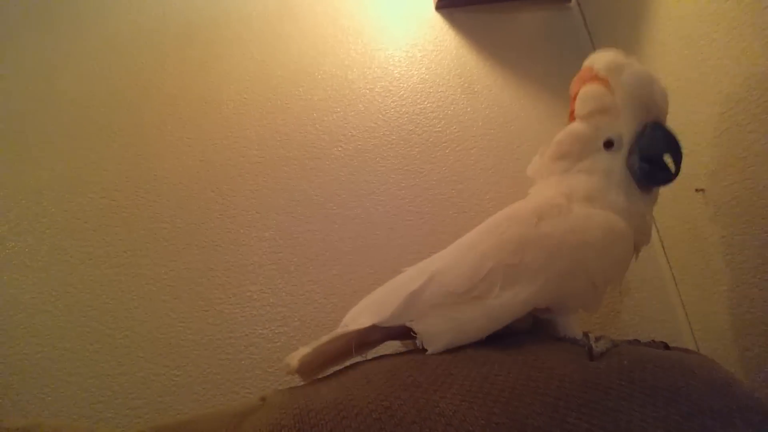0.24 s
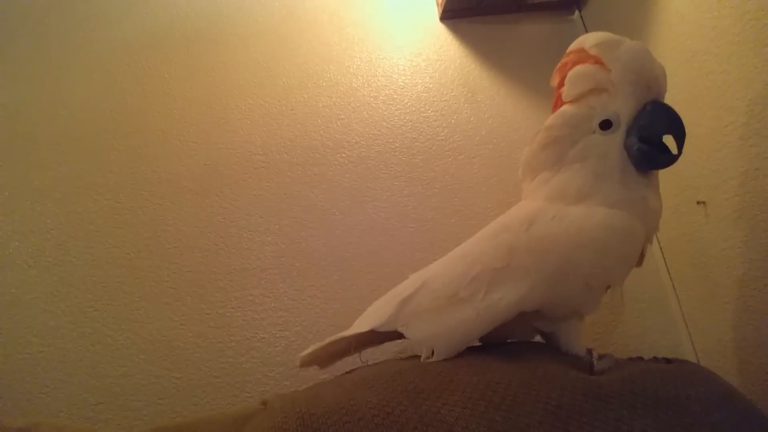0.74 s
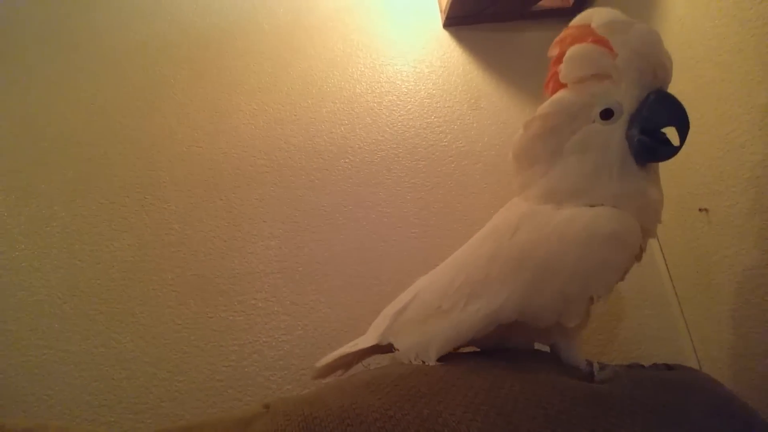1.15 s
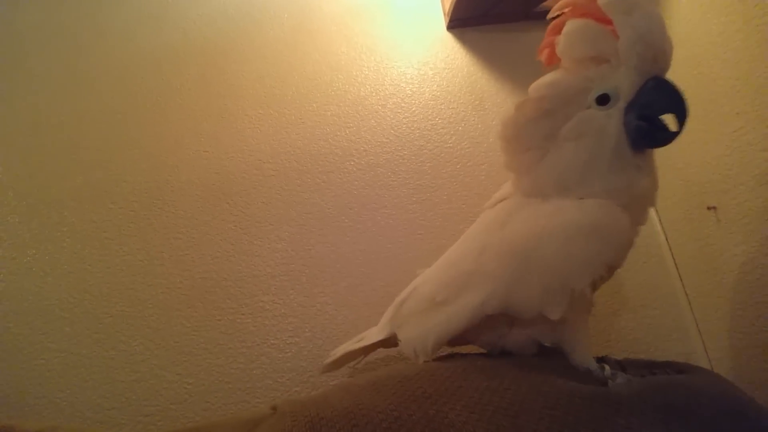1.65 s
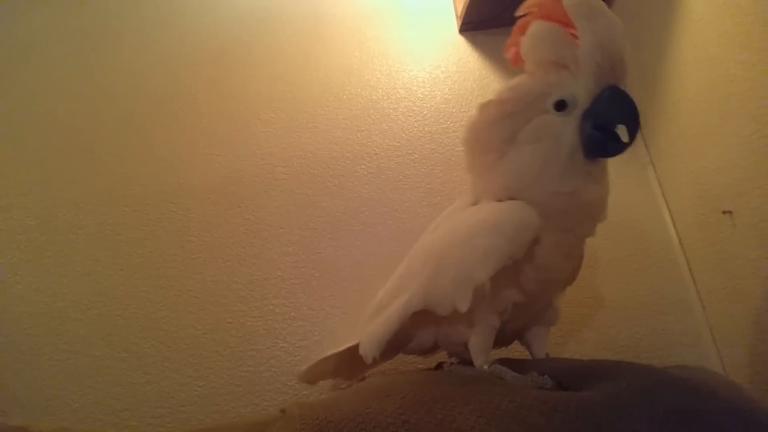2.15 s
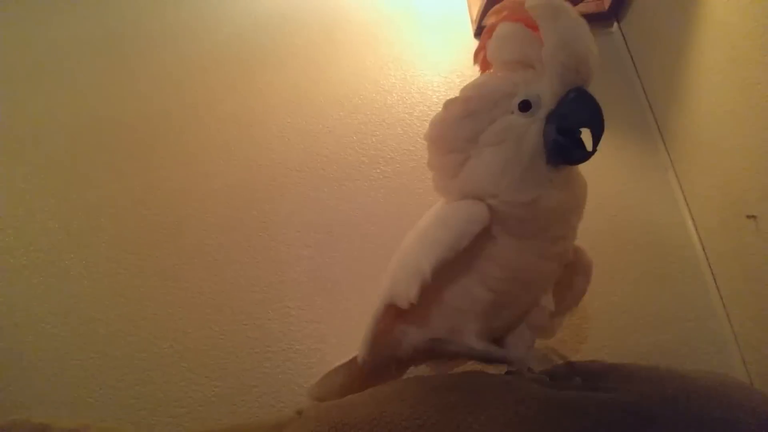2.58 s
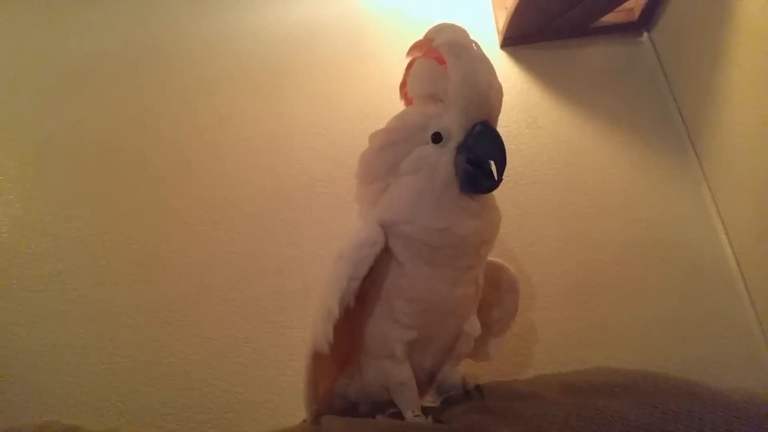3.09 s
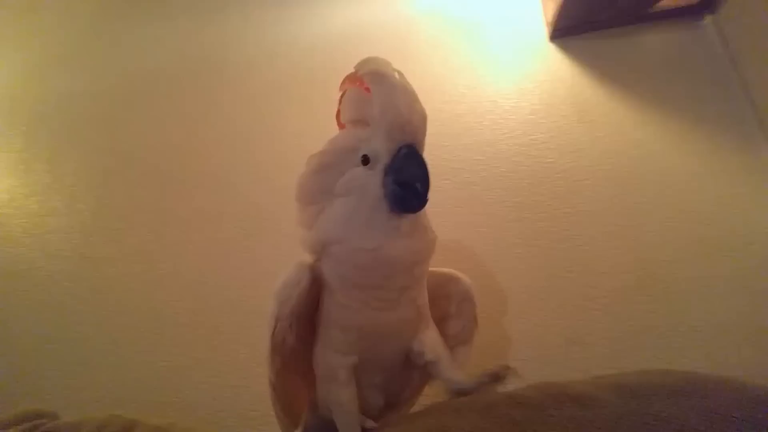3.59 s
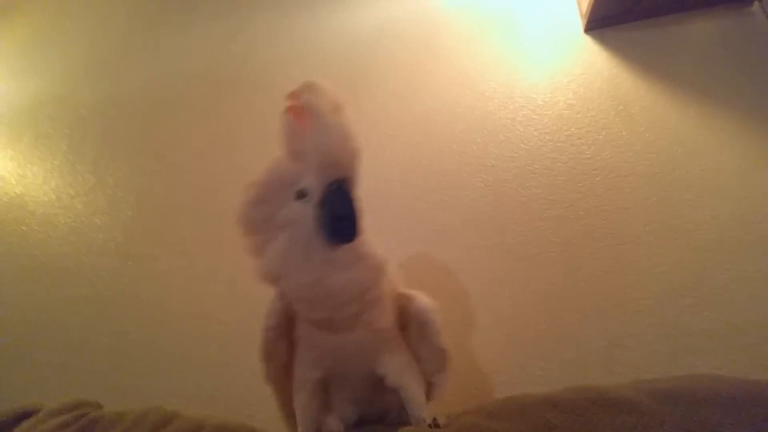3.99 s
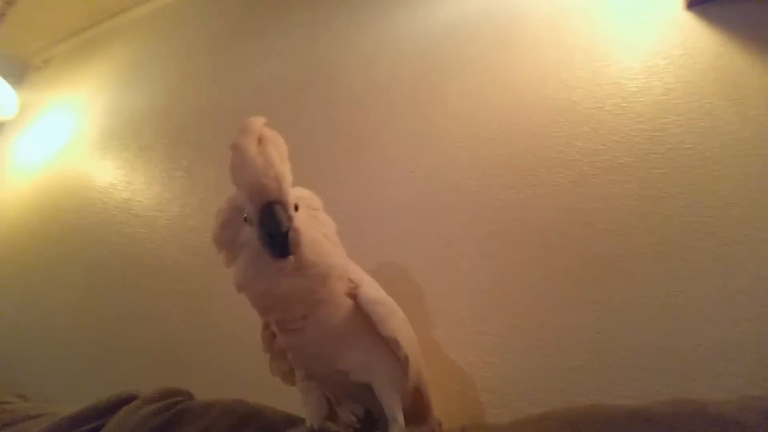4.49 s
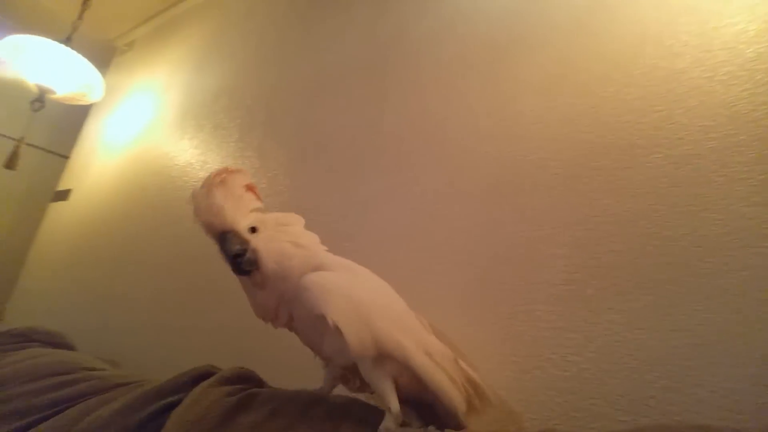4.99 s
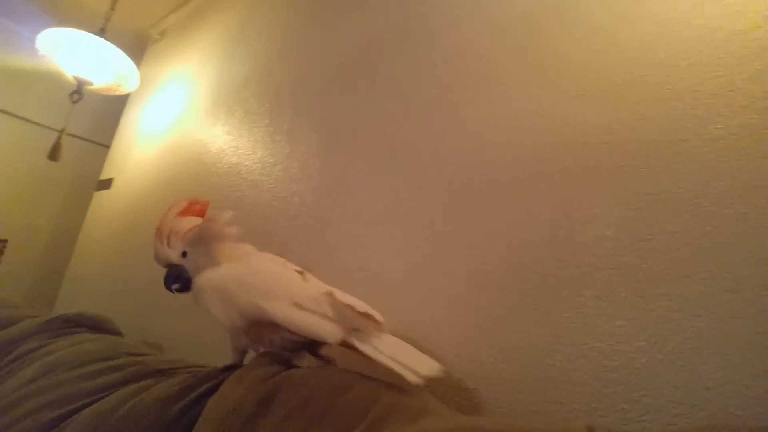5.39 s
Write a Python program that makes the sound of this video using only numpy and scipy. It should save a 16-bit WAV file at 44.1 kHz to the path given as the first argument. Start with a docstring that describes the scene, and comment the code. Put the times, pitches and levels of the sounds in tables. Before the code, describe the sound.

Close, raspy parrot squawks come one after another in a small room, one stretching into a strained screech, above a soft steady hum.

```python
"""A cockatoo squawks on a living-room sofa, over mains hum, a thin whine and a soft rush of air.
Its syrinx flaps chaotically in harsh bursts; feathers brush, and the beak clicks before some calls.
From 2 s on the voice now and then locks into a clear, nasal note. Near 3.5 s one long screech climbs
and strains, then short squawks run on to the end. All the while a close stereo camera circles the
bird, so the calls drift in from the left."""
import sys
import numpy as np
from scipy import signal
from scipy.fft import rfft, irfft
from scipy.io import wavfile
from scipy.ndimage import uniform_filter1d, minimum_filter1d, map_coordinates

SR = 44100
rng = np.random.default_rng(int(sys.argv[2]) if len(sys.argv) > 2 else 0)


def master(y):
    """Save y as 16-bit WAV."""
    cut = np.clip(np.atleast_2d(y).T, -1, 1)
    pcm = np.round(cut * 32767)  # scale
    wavfile.write(sys.argv[1], SR, pcm.astype(np.int16))


N = 248724
TIME = np.arange(N) / SR
FREQS = np.fft.rfftfreq(N, 1 / SR)
LOW_REST_HZ, HIGH_REST_HZ = 1282.5, 5115  # the two sliding throat resonances, at rest


def gain_of(db):
    """Decibels to amplitude."""
    return 10 ** (np.asarray(db) / 20)


def evened(x):
    """Scales to rms 1."""
    return x / np.sqrt(np.mean(x ** 2) + 1e-20)


def read(points, hz):
    """Reads a spectrum on a log-frequency axis."""
    f, value = np.transpose(points)
    return np.interp(np.log(hz + 1), np.log(f + 1), value)


def follow(rows, t):
    """Reads every column of an automation table at times t."""
    times, *columns = np.transpose(rows)
    return [np.interp(t, np.sort(times), column) for column in columns]


def wander(rate_hz):
    """Smooth random modulation of rms 1, rolling off above the rate."""
    return evened(irfft(rfft(rng.standard_normal(N)) * np.exp(-(FREQS / rate_hz) ** 2), N))


def bell(hz, centre_hz, half_width_hz):
    """The outline of one resonance, 1 at its centre."""
    return 1 / (1 + ((hz - centre_hz) / half_width_hz) ** 2)


def loudness(x, size):
    """Running rms over a window of samples."""
    window = np.hanning(size)
    return np.sqrt(abs(signal.oaconvolve(x ** 2, window / window.sum(), "same")) + 1e-12)


def hum(balance_db=1.8, waver_db=.4, whine_hz=15734, whine_db=-74):
    """Mains hum of a household motor, leaning left, and a thin electronic whine far above it."""
    # steady tones of the motor: (frequency [Hz], level [dB])
    partials = [(60, -69.5), (120, -47.5), (137.6, -61), (240, -79.5), (560, -70.5)]
    # the hum dips suddenly at two loud squawks, then slowly swells back: (time [s], gain [dB])
    swell = [(0, 1), (.35, 1.5), (.66, 4.5), (.78, .5), (1.48, 2), (1.62, -2.5), (2.5, -1.5), (3.6, -1),
             (4.4, -.5), (5, .5), (5.55, 3.5)]
    tones = sum(gain_of(db + waver_db * wander(5.2)) * np.sin(2 * np.pi * (hz * TIME + rng.random()))
                for hz, db in partials)
    drone = gain_of(follow(swell, TIME)[0]) * tones
    whine = gain_of(whine_db + 2 * wander(2)) * np.sin(2 * np.pi * whine_hz * TIME)
    return np.sqrt(2) * (drone * gain_of([[balance_db], [-balance_db]]) + whine)


def air(level_db=-52.5):
    """A soft rush of moving air, near the centre in the bass and wide in the treble."""
    # colour of the rush: (frequency [Hz], relative density [dB])
    colour = [(25, -10), (60, 1), (110, 4), (200, -2), (320, -5), (600, -6), (1300, -26), (2200, -19.5),
              (3500, -34), (6000, -32.5), (9000, -50), (15000, -39)]
    # how alike the two sides are: (frequency [Hz], correlation [0-1])
    likeness = [(50, 0.91), (300, 0.56), (1000, 0.91), (3000, .1)]
    left, other = rfft(rng.standard_normal((2, N)))
    same = np.clip(read(likeness, FREQS), -1, 1)
    right = same * left + np.sqrt(1 - same ** 2) * other
    return gain_of(level_db) * evened(irfft(np.array([left, right]) * gain_of(read(colour, FREQS)), N))


def gestures(t, onset_db=24, end_db=23.5, onset_db_per_s=2992.5, tail_db_per_s=475):
    """Each squawk swells, holds and fades as the beak arches open; in overlaps the louder one leads."""
    # squawks with the voice at its fullest; bite (near 2 kHz) and rasp (above 3 kHz) are set against
    # the low resonance: (start [s], length [s], effort [dB], attack [s], release [s], pitch [Hz],
    # roughness [0-1], low resonance [Hz], high resonance [Hz], bite [dB], rasp [dB],
    # hollow neck tone [dB], shrillness [dB])
    calls = [(-0.033, 0.23, -16.5, 0.03, 0.091, 509.5, 0.68, 1177, 5350, -5.5, -15.5, -5.5, 11.5),
             (0.273, 0.18, -11.5, 0.079, 0.065, 515, 0.6, 1260, 5290, -7.5, -19.5, -5.5, 11),
             (0.707, 0.22, -9.5, 0.055, 0.11, 640, 0.85, 1417, 5260, -11, -21, -2.5, 4.5),
             (1.031, 0.18, -10, 0.055, 0.086, 610, 0.7, 1363, 5054, -12.4, -25, -10.5, -2.5),
             (1.526, 0.23, -12, 0.03, 0.096, 595, 0.82, 1381, 5470, -9.5, -20.5, -5.5, 14),
             (1.94, 0.2, -10.5, 0.056, 0.1, 600, 0.7, 1337, 5600, -9.5, -20, -10, 20),
             (2.229, 0.17, -14.5, 0.064, 0.067, 555, 0.88, 1286, 5160, -12.5, -19.5, 0, 5),
             (2.629, 0.2, -11.5, 0.072, 0.087, 482, 0.64, 1275, 5170, -9, -16, 4, 9.5),
             (3.047, 0.17, -10.5, 0.052, 0.11, 530, 0.81, 1232, 5430, -8.5, -19, -5.5, 8),
             (3.226, 0.18, -9.5, 0.067, 0.1, 620, 0.8, 1256, 5265, -19.5, -20, 2, 6.5),
             (3.417, 0.37, -10.5, 0.089, 0.1136, 630, 0.8, 1284, 5110, -5.5, -20, -0.5, 5),
             (3.756, 0.229, -12, 0.0986, 0.1, 570, 0.8, 1260, 5080, -14, -15.5, 7.5, 11),
             (3.923, 0.21, -15.0, 0.037, 0.043, 591.5, 0.75, 1248, 5098, -10.5, -21, -1, 5),
             (4.016, 0.154, -12.5, 0.022, 0.066, 551.2, 0.8, 1287, 5150, -1, -16, 2.2, -13.5),
             (4.382, 0.16, -11.5, 0.086, 0.057, 600, 0.85, 1268, 4853, -15.5, -19, 1.5, 6),
             (4.562, 0.23, -15.5, 0.11, 0.066, 610, 0.8, 1223, 4985, -11, -17.5, 5.5, 6),
             (4.829, 0.23, -12.5, 0.04, 0.091, 675, 0.67, 1285, 4763, -6, -20, -1.5, -5),
             (5.139, 0.15, -20, 0.042, 0.092, 623.5, 0.85, 1217, 4811, -20.5, -18, 4, 8),
             (5.262, 0.26, -10.5, 0.13, 0.084, 590, 0.72, 1197, 4766, -3, -19.5, -5.8, -5.1),
             (5.529, 0.26, -13, 0.078, 0.07, 625, 0.62, 1205, 5247, -3.5, -21, -2.7, 10)]
    arch_skew, throat_open_s = .85, .03  # with a skew under 1 the beak is widest early
    start, length, effort_db, attack, release, *voice = np.transpose(calls)[:, :, None]
    age, remaining = t - start, start + length - t
    rise_db = onset_db * np.clip(1 - age / attack, 0, 1) ** 2 + onset_db_per_s * np.maximum(-age, 0)
    fall_db = end_db * np.clip(1 - remaining / release, 0, 1) ** 2
    tail_db = tail_db_per_s * np.maximum(-remaining, 0)
    each_db = effort_db - rise_db - fall_db - tail_db
    level_db = each_db.max(0)
    share = gain_of(each_db - level_db) ** 2
    shut = 1 - np.sin(np.pi * np.clip(age / length, 0, 1) ** arch_skew)
    opening = np.exp(-np.maximum(age, 0) / throat_open_s)  # 1 at the onset, then dying away
    return [level_db] + [(share * v).sum(0) / share.sum(0) for v in (shut, opening, *voice)]


def controls(t, *names):
    """The named voice controls at times t: squawks, the climb of the screech, locked notes on top."""
    # the long screech climbs and strains: (time [s], pitch rise [share], added roughness [share],
    # added effort [dB], added bite [dB], added rasp [dB], added shrillness [dB])
    screech = [(3.49, 0, 0.015, 0, 2, 2, -2), (3.55, 0.079, -0.382, -1.5, -8, 3.5, -2),
               (3.595, 0.13, -0.28, -3.5, -8, 10.5, 5), (3.635, 0.22, -.28, -4, -2.5, 19, 16),
               (3.675, .29, -.43, -1, 6.5, 16, -1.5), (3.72, 0.25, -.38, 2, 5.5, 4.5, -12.5),
               (3.765, .22, -0.39, 0, -5, 2, -10), (3.81, 0.011, 0, -1, 0.5, -0.5, -1)]
    # a shut beak lowers the voice and makes it rougher, duller and more hollow
    pitch_sag, low_sag, high_sag = .13, .02, .033
    shut_rough, shut_bite_db, shut_rasp_db, shut_neck_db = .3, -13.5, -6, 13.5
    # at each onset the resonances scoop up by these shares, and the first rush of air is brighter
    low_scoop, high_scoop, opening_bite_db, opening_rasp_db = .21, .055, 2, 4.5
    low_lift = .42  # share of the climb that the low resonance follows
    grid = TIME[::44]
    effort, shut, opening, pitch, rough, low, high, bite, rasp, neck, shrill = gestures(grid)
    climb, more_rough, more_effort, more_bite, more_rasp, more_shrill = follow(screech, grid)
    lock, note_pitch, note_rough, note_bite, note_rasp = locked_notes(grid)
    curves = dict(
        effort=effort + more_effort,
        pitch=(1 - lock) * pitch * (1 - pitch_sag * shut) * (1 + climb) + lock * note_pitch,
        rough=(1 - lock) * (rough + shut_rough * shut + more_rough) + lock * note_rough,
        low=low * (1 - low_sag * shut - low_scoop * opening) * (1 + low_lift * climb),
        high=high * (1 - high_sag * shut - high_scoop * opening),
        bite=bite + shut_bite_db * shut + opening_bite_db * opening + more_bite + lock * note_bite,
        rasp=rasp + shut_rasp_db * shut + opening_rasp_db * opening + more_rasp + lock * note_rasp,
        neck=neck + shut_neck_db * shut,
        shrill=shrill + more_shrill)
    return [np.interp(t, grid, curves[name]) for name in names]


def syrinx(jitter=.12, waver=.025, shimmer_db=6, smear=.45, leak=.06):
    """Membrane pulses, uneven in timing and strength when rough, each with a puff of turbulence."""
    pitch, rough = controls(TIME, "pitch", "rough")
    rough = np.clip(rough, 0, 1)
    wobble = np.exp(rough * (jitter * wander(350) + waver * wander(50)))
    cycles = np.cumsum(pitch * wobble) / SR
    # the membranes close in a rolling wave, so each pulse is spread over its cycle
    pulses = evened(sum(np.cos(2 * np.pi * k * cycles + smear * k ** 2) for k in range(1, 25)))
    puffs = evened((1 + np.exp(-2 * (cycles % 1))) * rng.standard_normal(N))
    turbulence = .5 * rough ** 2
    strength = gain_of(rough * shimmer_db * wander(550))
    return strength * (pulses * (1 - rough / 2) + (leak + turbulence) * puffs)


def overtone_ripple(hz, high_hz, depth_db=3.5):
    """Small random peaks and dips (dB) in the treble, slowly shifting, riding the high resonance."""
    field = rng.standard_normal((400, len(high_hz)))
    for _ in range(2):
        field = uniform_filter1d(uniform_filter1d(field, size=5, axis=0), size=35, axis=1)
    place = np.arange(len(hz))[:, None] * HIGH_REST_HZ / high_hz
    frame = np.broadcast_to(np.arange(len(high_hz)), place.shape)
    treble = np.clip((hz - 1500) / 2500, 0, 1)
    return depth_db * treble * map_coordinates(evened(field), [place, frame], order=1, mode="nearest")


def throat(source, peak_db=6, bite_trim_db=-1, neck_hz=550, shrill_hz=4200, low_cut_hz=470):
    """A low and a high resonance slide as neck and beak move; the bite between them stays in place."""
    # the body, bite and rasp regions of throat and beak, at rest: (frequency [Hz], relative level [dB])
    body_shape = [(250, -51.5), (400, -24), (540, -15), (700, -12), (950, 5), (1250, -2), (1500, 6.5),
                  (1750, -8), (2200, -12), (3200, -78)]
    bite_shape = [(1200, -40), (1650, -7), (1850, 0), (2150, -7), (2500, -7), (2800, -16), (3300, -21),
                  (3800, -27), (5000, -55)]
    rasp_shape = [(2000, -40), (3000, -17), (3700, -20), (4400, -13), (4850, -8), (5200, 1), (5500, -3),
                  (6300, -23), (7050, -10), (9200, -35), (10500, -23), (11800, -34), (13200, -30),
                  (16000, -46)]
    hz, t, spectrum = signal.stft(source, SR, nperseg=512, noverlap=384)
    hz = hz[:, None]
    low_hz, high_hz = controls(t, "low", "high")
    bite_db, rasp_db, neck_db, shrill_db = controls(t, "bite", "rasp", "neck", "shrill")
    ripple = overtone_ripple(hz, high_hz)
    body = read(body_shape, hz * LOW_REST_HZ / low_hz) + peak_db * bell(hz, low_hz, 140)
    body += neck_db * bell(hz, neck_hz, 130)
    bite = read(bite_shape, hz) + ripple
    rasp = read(rasp_shape, hz * HIGH_REST_HZ / high_hz) + shrill_db * bell(hz, shrill_hz, 750) + ripple
    regions = [(body, 0), (bite, bite_db + bite_trim_db), (rasp, rasp_db)]
    power = sum(gain_of(shape + db) ** 2 / (gain_of(shape) ** 2).sum(0) for shape, db in regions)
    power /= 1 + (low_cut_hz / (hz + 1)) ** 12  # so small a beak radiates no bass
    return signal.istft(spectrum * np.sqrt(power), SR, nperseg=512, noverlap=384)[1][:N]


def squawks(tremble_db=1.5, fast_share=.75):
    """The oscillation limits its own swing, so the voice stays dense and follows the bird's effort."""
    voice = throat(syrinx())
    swing = loudness(voice, size=221) ** fast_share * loudness(voice, size=1301) ** (1 - fast_share)
    effort_db, rough = controls(TIME, "effort", "rough")
    return gain_of(effort_db + tremble_db * rough * wander(37)) * voice / swing


def feathers(flutter_db=3):
    """Plumage brushes, faint and uneven, as the bird shifts."""
    # brushes of the feathers: (start [s], length [s], level [dB])
    rustles = [(0.453, 0.21, -57.5), (4.159, 0.17, -54.5)]
    # colour of their hiss: (frequency [Hz], relative density [dB])
    colour = [(2000, -9.5), (4200, -19), (5500, -4), (7500, -12), (10000, -30), (15000, -22)]
    hiss = evened(irfft(rfft(rng.standard_normal((2, N))) * gain_of(read(colour, FREQS)), N))
    swell = sum(gain_of(db) * np.sin(np.pi * np.clip((TIME - start) / length, 0, 1))
                for start, length, db in rustles)
    return swell * gain_of(flutter_db * wander(40)) * hiss


def beak_clicks(attack_s=.0011):
    """The mandibles tap together and ring briefly."""
    # taps of the beak: (time [s], peak level [dB])
    clicks = [(.679, -39), (1.913, -38), (2.609, -34), (3.012, -36), (4.362, -29)]
    # its ringing modes: (frequency [Hz], relative level [dB], time to fall 60 dB [s])
    modes = [(534, 4, 0.059), (770, -7.5, 0.053), (1140, 5.5, 0.027), (1550, -5, 0.029),
             (2220, -12.5, 0.039), (4550, -10.5, 0.02)]
    t = np.arange(SR // 10) / SR
    ring = sum(gain_of(db - 60 * t / t60) * np.sin(2 * np.pi * hz * t) for hz, db, t60 in modes)
    ring *= np.minimum(t / attack_s, 1)
    taps = np.zeros(N)
    for start, db in clicks:
        taps[round(start * SR)] = gain_of(db)
    return signal.oaconvolve(taps, ring / abs(ring).max())[:N]


def locked_notes(t, fade_s=.00796):
    """How far the syrinx is locked (0-1), and the pitch, roughness, bite and rasp of the nearest note."""
    # moments when the membranes lock into a note: (start [s], length [s], pitch [Hz], glide [Hz/s],
    # roughness [0-1], added bite [dB], added rasp [dB])
    notes = [(2.0, .067, 601.2, 7.5, .07, -5.5, -3.5), (2.746, .038, 462, -1000, 0.5, -3, -0.5),
             (3.119, .024, 542.5, 200.5, .42, -5.5, -0.5), (3.146, .02, 655, -300, 0.5, -4, -1),
             (3.257, .019, 480, 401, 0.42, 4.5, -2.5), (3.283, .054, 644.3, -320, .05, 13, 0),
             (3.821, .03, 544.6, 93, 0.08, -19, 3), (4.025, .03, 592.3, -1200, 0.51, -3.5, 2),
             (4.476, .038, 618, 460, .2, 8.5, 7.5), (4.121, .025, 478.1, -1500, 0.43, -4, -1),
             (4.884, .045, 683, -900, 0.5, -4, -4), (4.985, .025, 658, -600, .48, -8, -4),
             (5.345, .042, 593, 747.5, .06, -10, 13), (5.585, 0.045, 627, -250, 0.6, -7, 0)]
    start, length, pitch, glide, *timbre = np.transpose(notes)
    outside_s = abs(t[:, None] - start - length / 2) - length / 2
    nearest = outside_s.argmin(1)
    lock = np.clip(1 - outside_s.min(1) / fade_s, 0, 1)
    note_hz = pitch[nearest] + glide[nearest] * (t - start[nearest])
    return [lock, note_hz] + [column[nearest] for column in timbre]


def microphones(x):
    """The nearer microphone hears the bird first, the camera shades one side, close echoes comb it."""
    # the bird's direction, before the two frequency weightings below:
    # (time [s], lead of the left microphone [ms], left minus right [dB])
    bearing = [(0, 0.19, 16.5), (1.6, 0.18, 14.5), (2.7, 0.11, 12), (3.2, 0.042, 10.5), (3.6, -0.036, 8.5),
               (4, -0.052, 5.5), (4.6, -0.12, 4.5), (5.4, -0.17, 3)]
    # sound bends round the camera body: (frequency [Hz], weight on that lead [factor])
    detour = [(450, .53), (1000, 1.15), (1500, 1.38), (2200, .91), (2800, 1.17), (3800, .96), (5000, 1.07)]
    # the body's shadow: (frequency [Hz], weight on that imbalance [factor])
    shadow = [(300, .08), (1300, -0.074), (2400, 0.43), (4400, .59), (15000, 0.78)]
    # echoes off walls and sofa: (starting delay [ms], drift [ms/s], level [dB], left lead [ms])
    echoes = [(.31, .334, -14, .5), (1.76, .206, -20, .41), (.39, .283, -19, .31)]
    hz, t, spectrum = signal.stft(x, SR, nperseg=1024, noverlap=768)
    lead_ms, balance_db = follow(bearing, t)
    hz, side = hz[:, None], np.array([.5, -.5])[:, None, None]
    phase_per_ms = 2j * np.pi * hz / 1000
    timing = np.exp(phase_per_ms * side * lead_ms * read(detour, hz))
    direct = timing * gain_of(side * read(shadow, hz) * balance_db)
    direct /= np.sqrt((abs(direct) ** 2).mean(0))  # constant-power panning
    reflected = sum(gain_of(db) * np.exp(phase_per_ms * (side * lead - delay - drift * t))
                    for delay, drift, db, lead in echoes)
    return signal.istft(spectrum * (direct + reflected), SR, nperseg=1024, noverlap=768)[1][:, :N]


def room(x, early_db=-12, tail_db=-24, early_decay_s=.007, predelay_s=.003, taps_per_s=2500):
    """Quick reflections from the near walls, then a short tail among soft furniture."""
    # the room's decay: (frequency [Hz], time to fall 60 dB [s])
    decay = [(200, 0.27), (1200, 0.29), (5000, 0.3), (14000, 0.049)]
    t = np.arange(SR // 2) / SR
    signs = rng.choice([-1., 1.], (2, len(t)))
    taps = signs * (rng.random((2, len(t))) < taps_per_s / SR) * (t > predelay_s)
    hz, age, spectrum = signal.stft(taps, SR, nperseg=256)
    fade = gain_of(-60 * age / read(decay, hz)[:, None])
    tail = signal.istft(spectrum * fade, SR, nperseg=256)[1][:, :len(t)]
    early = taps[::-1] * np.exp(-t / early_decay_s)
    response = sum(gain_of(db) * part / np.linalg.norm(part[0])
                   for part, db in [(early, early_db), (tail, tail_db)])
    return signal.fftconvolve(x[None], response, axes=1)[:, :N]


def scene():
    """The bird in its room, over a bed of hum and air."""
    bird = squawks() + beak_clicks()
    return microphones(bird) + room(bird) + feathers() + hum() + air()


def record(dry, ceiling=.93, cutoff_hz=15850):
    """A smooth limiter holds down the highest peaks, then a steep low-pass trims the top."""
    allowed_gain = ceiling / np.maximum(abs(dry).max(0), ceiling)
    limited = dry * uniform_filter1d(minimum_filter1d(allowed_gain, size=301), size=301)
    low_pass = signal.firwin(1023, cutoff_hz, window=("kaiser", 9), fs=SR)
    return signal.oaconvolve(limited, low_pass[None], "same")


dry = scene()
out = record(dry)
master(out)
```